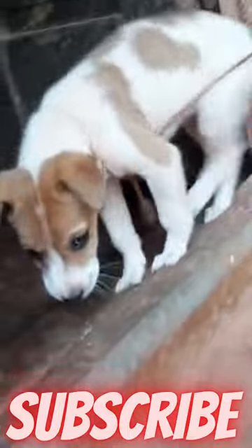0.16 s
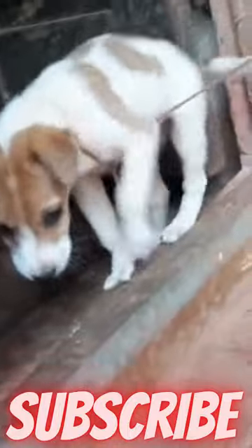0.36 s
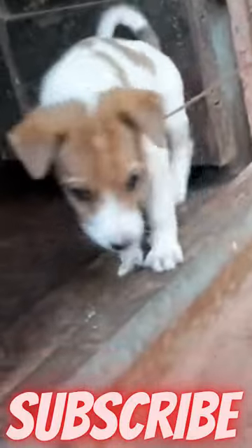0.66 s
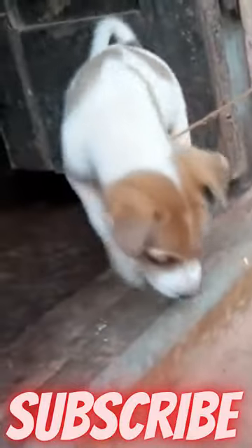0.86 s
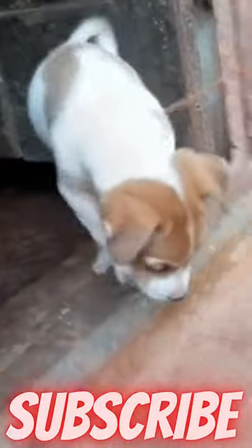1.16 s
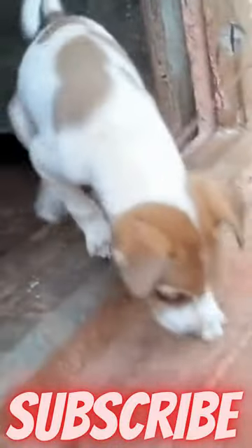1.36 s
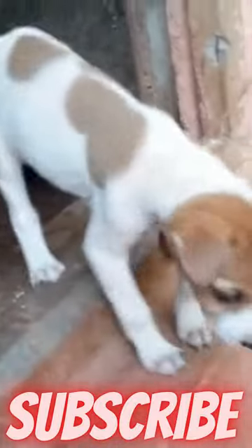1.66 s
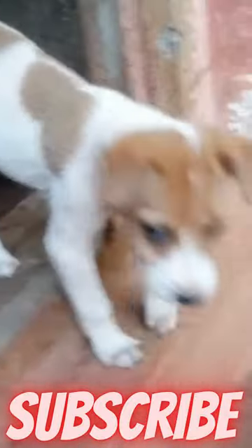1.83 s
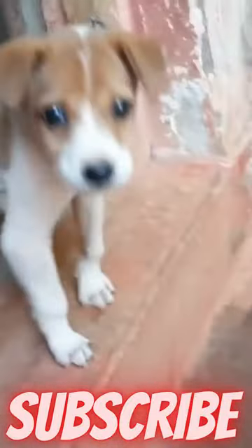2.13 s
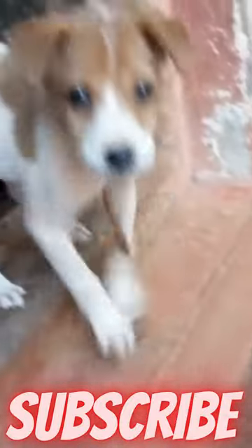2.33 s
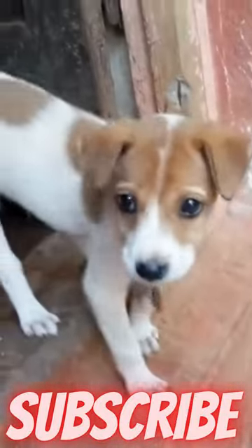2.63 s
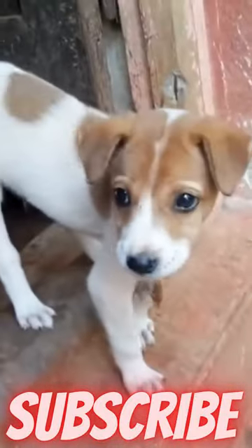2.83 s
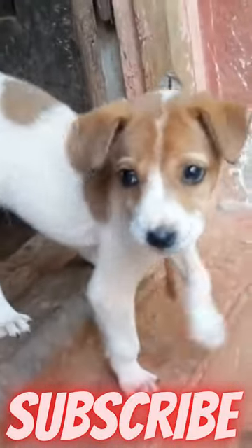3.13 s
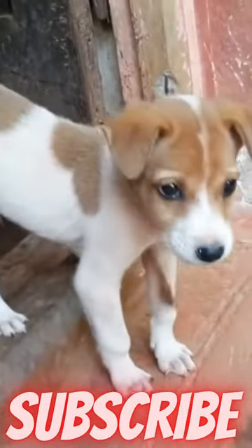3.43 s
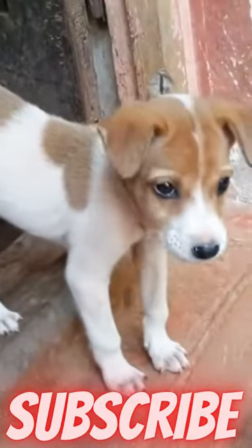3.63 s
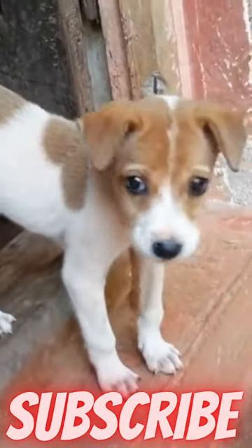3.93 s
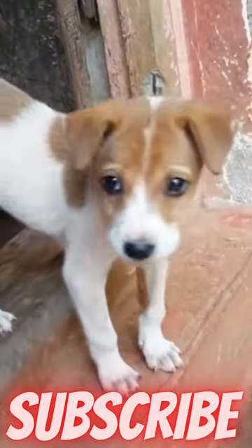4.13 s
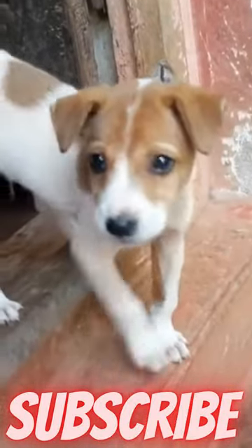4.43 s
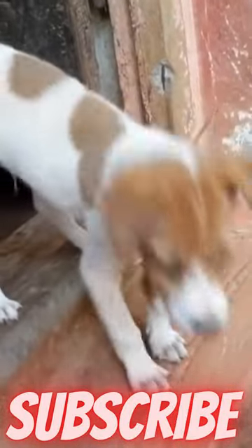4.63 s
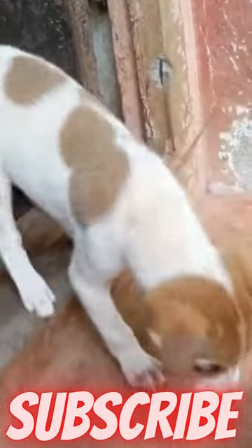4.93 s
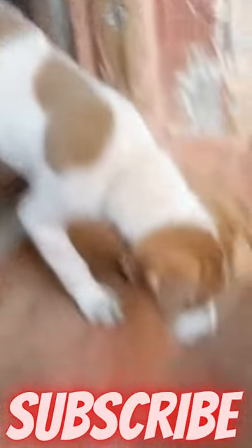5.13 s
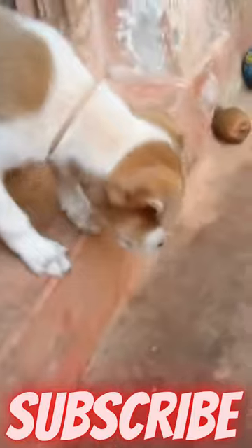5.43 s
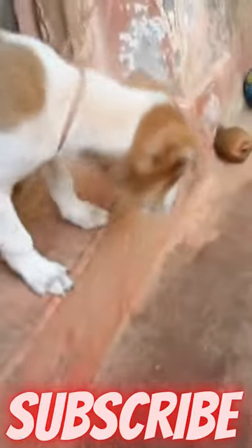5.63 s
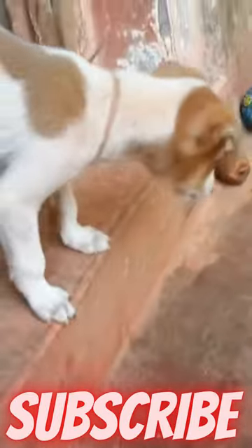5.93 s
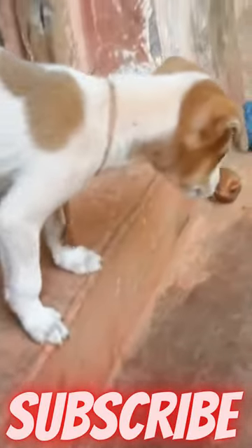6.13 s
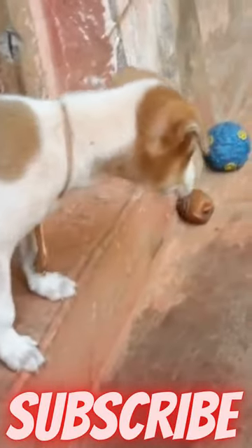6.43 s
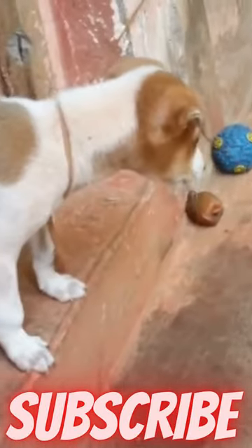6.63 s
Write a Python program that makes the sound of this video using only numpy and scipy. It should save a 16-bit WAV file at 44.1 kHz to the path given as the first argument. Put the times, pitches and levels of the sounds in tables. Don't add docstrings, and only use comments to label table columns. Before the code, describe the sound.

A small puppy very close to a phone microphone in a hard-walled concrete yard. A short whine dies away over a low hollow ringing, then small gulps, soft paw scuffs and claw ticks. A quick cluster of hollow knocks and rubbing follows on a tub. Then comes a thin rising whine, three spaced yips, one loud sharp yelp, a shaky yip and quiet low whimpers, with a short gap before the last. Faint hum beneath.

```python
import sys
import numpy as np
from scipy import signal
from scipy.fft import rfft, irfft, next_fast_len
from scipy.io import wavfile
from scipy.ndimage import uniform_filter1d

SR = 44100
rng = np.random.default_rng(int(sys.argv[2]) if len(sys.argv) > 2 else 0)


def makeup_ratio(level_db):
    decades = np.asarray(level_db, float) / 20
    return 10 ** decades


def dump(signal):
    limited = np.clip(np.atleast_2d(signal).T, -1, 1)
    pcm = np.round(limited * 32767).astype(np.int16)
    wavfile.write(sys.argv[1], SR, pcm)


N = 299420

# time_s, pitch_hz, effort_db, mouth_opening_db (as brightness)
WHINE_FADING = [(0.0, 948.7, -18, 3), (0.02, 958.8, -30, 10), (0.044, 939.9, -19, 0),
                (0.068, 924.6, -19, -3), (0.09, 943.0, -26, 2), (0.114, 904, -28, -2), (0.13, 930, -24, -8),
                (0.216, 906.3, -42, -8), (0.29, 923.9, -67, 0)]
WHINE_RISING = [(2.722, 760, -40, -21), (2.762, 922, -41, -6), (2.782, 958, -34, -12),
                (2.79, 1035, -27, -26), (2.858, 1125, -25.5, -32), (2.88, 1100, -27, -33),
                (2.9, 1185, -27, -30), (2.926, 1075, -31, -29), (2.945, 1040, -55, -4)]
YIP_LONG = [(3.474, 1196, -54, -21), (3.48, 1211, -34, -18), (3.5, 1194, -31, -15), (3.522, 1374, -28, -14),
            (3.606, 1310, -30, -14), (3.698, 1366, -26, -8), (3.73, 1360, -27, -15),
            (3.742, 1110, -30, -24), (3.766, 950, -64, 8)]
YIP_SHORT = [(4.068, 1250, -58, -25), (4.076, 1260, -31, -29), (4.09, 1140, -34, -28),
             (4.112, 1325, -26, -34), (4.142, 1345, -25, -31), (4.224, 1340, -25, -27),
             (4.237, 1240, -25.5, -25), (4.243, 1060, -33, -22), (4.262, 950, -68, 5)]
YIP_CRACKING = [(4.406, 950, -46, -20), (4.438, 955, -36, -35), (4.452, 1340, -27, -31),
                (4.478, 1450, -20.5, -17), (4.575, 1475, -20, -18), (4.609, 1590, -22, -17),
                (4.619, 1830, -40, -8), (4.632, 1400, -19, -27), (4.652, 1200, -55, -10)]
YELP = [(4.788, 975, -39, -25), (4.814, 1215, -13, -7), (4.836, 1405, -8, -11), (4.851, 1520, -10, -12),
        (4.856, 1680, -18, -9), (4.862, 1710, -11.5, -16), (4.888, 1700, -10.5, -17),
        (4.936, 1920, -16.5, -20), (4.96, 1580, -27, -30)]
YIP_WAVERING = [(5.118, 790, -39, -8), (5.163, 1030, -25, -15), (5.175, 1300, -34, -8),
                (5.228, 1260, -36, -1), (5.252, 1150, -34, -8), (5.276, 1345, -34, -2),
                (5.333, 1590, -36, -8), (5.348, 1340, -39, -24), (5.358, 1300, -58, -10)]
WHINE_SOFT = [(5.492, 852, -46, -9), (5.506, 876, -37, -11), (5.52, 985, -40, -3), (5.61, 1040, -41, -6),
              (5.628, 1200, -43, 0), (5.646, 1185, -40, -9), (5.653, 950, -45, -14), (5.668, 930, -51, -13)]
WHINE_LOW = [(5.806, 822, -45, -14), (5.822, 818, -40, -16), (5.846, 938, -39, -5), (5.862, 955, -43, -2),
             (5.9, 936, -37, -5), (5.938, 937, -38, -3), (5.971, 1016, -47, -4)]
HICCUP = [(5.974, 625, -44, -2), (5.986, 643, -36, -12), (6.004, 640, -45, -12), (6.009, 1124, -42, -10),
          (6.023, 938, -43, -22), (6.041, 950, -60, -15)]
WHINE_LAST = [(6.238, 833.8, -38, -14), (6.246, 793.5, -38, -13), (6.264, 857.3, -38, -14),
              (6.282, 876.7, -36, -14), (6.372, 825.1, -36, -14), (6.454, 841.7, -37, -17),
              (6.504, 880.0, -36, -15), (6.536, 883.7, -34, -23), (6.56, 864.2, -60, -10)]
CALLS = [WHINE_FADING, WHINE_RISING, YIP_LONG, YIP_SHORT, YIP_CRACKING, YELP, YIP_WAVERING,
         WHINE_SOFT, WHINE_LOW, HICCUP, WHINE_LAST]
# time_s, pitch_hz
NOSE_WHISTLES = [
    [(2.82, 12450), (2.885, 12400)],
    [(2.915, 13400), (2.95, 13100), (2.96, 12300)],
    [(4.455, 13500), (4.468, 13200), (4.495, 13800), (4.58, 13750), (4.61, 14050), (4.66, 11990)],
    [(4.815, 12800), (4.84, 12250), (4.875, 12600), (4.92, 12100), (4.948, 11600), (4.965, 11900)],
    [(5.165, 13600), (5.2, 12300), (5.235, 12230), (5.255, 12600), (5.28, 11980), (5.362, 11270)],
    [(5.535, 13800), (5.57, 13400), (5.665, 12960)],
    [(5.855, 12500), (5.9, 12160), (5.96, 12075), (5.985, 11550), (6.01, 12300), (6.04, 11400)],
]
# frequency_hz, gain_db
NOSE_PASSAGE = [(8000, -19), (9200, -18), (10100, -3.5), (11300, -8), (12600, -2.5), (14000, -9),
                (15700, -15)]
NOSTRIL_HZ = (11500, 14500)


def in_time(rows):
    s, *columns = np.transpose(rows)
    return [np.interp(np.arange(N) / SR, s, c) for c in columns]


def inside(tables):
    t = np.arange(N) / SR
    on = sum((t >= rows[0][0]) & (t <= rows[-1][0]) for rows in tables) > 0
    return uniform_filter1d(on * 1., size=220)


def rms_one(x):
    return x / np.sqrt(np.mean(x ** 2) + 1e-20)


def drift(rate_hz):
    r = np.exp(-40 * np.pi * rate_hz / SR)
    slow = signal.lfilter([1], [1, -2 * r, r * r], rng.standard_normal(N // 20 + 1002))
    slow = slow[1000:]
    return np.interp(np.arange(N) / 20, np.arange(len(slow)), rms_one(slow))


def ring(clicks, hz, t60_s):
    r = makeup_ratio(-60 / (t60_s * SR))
    w = 2 * np.pi * hz / SR
    return signal.lfilter([0, np.sin(w)], [1, -2 * r * np.cos(w), r * r], clicks + 1e-18)


def gain_at(spectrum, hz):
    below = (spectrum[0][0] / 2, -90)
    above = (spectrum[-1][0] * 1.1, -90)
    points = np.array([below, *spectrum, above])
    return makeup_ratio(np.interp(np.log(hz + 1), np.log(points[:, 0]), points[:, 1]))


def coloured(spectrum):
    size = next_fast_len(N)
    shaped = rfft(rng.standard_normal(size)) * gain_at(spectrum, np.fft.rfftfreq(size, 1 / SR))
    return rms_one(irfft(shaped, size)[:N])


def swells(rows):
    t = np.arange(0, N, 20) / SR
    power = 0
    for s, peak_db, rise_s, fall_s in rows:
        below_peak_db = 20 * np.maximum((s - t) / rise_s, (t - s) / fall_s)
        power = power + makeup_ratio(peak_db - below_peak_db) ** 2
    return np.interp(np.arange(N) / SR, t, np.sqrt(power))


def grown(hz, edges):
    return np.clip((hz - edges[0]) / (edges[1] - edges[0]), 0, 1)


def lifted(noise, edges, lift_db):
    size = next_fast_len(N)
    spectrum = rfft(noise, size)
    share = np.round(2 * grown(np.fft.rfftfreq(size, 1 / SR), edges)) / 2
    total, power = 0, 0
    for part in (0, .5, 1):
        band = irfft(spectrum * (share == part))[:N]
        gain = makeup_ratio(part * lift_db)
        total = total + band * gain
        power = power + np.mean(band ** 2) * gain ** 2
    return total / np.sqrt(power)


def controls():
    # start_s, end_s, first_crest_s, rate_per_s, share_of_pitch
    tremors = [
        (2.8, 2.93, 2.815, 23.5, .015),
        (5.17, 5.34, 5.18, 21.3, .025),
        (4.47, 4.58, 4.495, 21, .01),
    ]
    # time_s, octave_over_fundamental_db, mouth_ring_hz, jaw_lift_db,
    # lip_lift_db
    jaw_shape = [(0, 14, 3800, 0, 3), (.05, 18, 3900, 0, 3), (.1, 15, 4000, 3, 0), (.15, 13, 4500, 5, 3),
                 (.2, 2, 4600, 5, 8), (.29, -10, 4600, 0, 4), (2.722, 3, 4600, 0, 0),
                 (2.762, -12, 4550, 8, 8), (2.79, -26, 5000, 3, 12), (2.84, -36, 5000, 0, 12),
                 (2.9, -29, 4700, -8, 9), (2.945, -22, 4500, 0, 13), (3.474, -22, 4850, 8, 12),
                 (3.538, -24, 4300, 0, 17), (3.575, -21, 4000, 0, 5), (3.616, -17, 5100, 0, 11),
                 (3.65, -20, 4100, 0, 10), (3.72, -20, 4100, 0, 12), (3.75, -33, 5400, -15, 3),
                 (4.068, -25, 4800, 0, 0), (4.133, -35, 4000, 0, 8), (4.16, -28, 5300, 0, 9),
                 (4.22, -31, 5300, 0, 8), (4.262, -31, 5000, -8, 10),
                 (4.406, -22, 4500, 15, 0), (4.442, -19, 4500, 15, 0), (4.468, -25, 5600, 0, 5),
                (4.494, -39, 4400, 0, 2), (4.52, -31, 5750, 0, 0), (4.55, -41, 4400, 0, 3),
                (4.575, -52, 4400, 0, 7), (4.6, -35, 4600, 0, 14), (4.652, -39, 5200, 0, 12),
                (4.784, -19, 5000, 15, 6), (4.808, -8, 5200, 12, 3), (4.826, -14, 5450, 8, 0),
                (4.844, -27, 4600, 0, -7), (4.862, -8, 5100, 0, 12), (4.895, -11, 5300, 0, 14),
                (4.926, -15, 5600, 0, 13), (4.96, -27, 5000, 0, 18), (5.118, 5, 4800, 20, -5),
                (5.152, -8, 4000, 6, -5), (5.19, 1, 5250, 0, -8), (5.236, 6, 5000, -3, -8),
                (5.258, -1, 4600, 0, -3), (5.28, -3, 4150, 3, -14), (5.31, -3, 4400, 0, -6),
                (5.326, -15, 4700, 0, 8), (5.365, -21, 4600, 0, 8),
                 (5.492, -7, 4300, 10, 0), (5.523, -8, 3950, 5, -8), (5.567, 2, 5050, 0, 8),
                (5.59, -19, 4150, 0, -5), (5.611, -17, 4200, -10, 0), (5.633, -5, 4700, 0, 0),
                (5.668, -15, 4700, 0, 0), (5.806, -5, 4850, 5, 0), (5.838, -18, 4470, 5, -10),
                (5.87, -8, 4750, -3, -8), (5.93, -6, 4650, -5, -8), (5.971, 5, 4200, 0, 0),
                (5.974, 12, 4100, 0, 0), (6.041, -22, 4250, 0, 0), (6.238, -7, 5000, 10, 0),
                (6.27, -9, 4700, 0, -15), (6.31, -11, 5000, 0, -12), (6.4, -9, 5000, 0, -3),
                (6.5, -15, 4350, 4, -5), (6.532, 3, 4400, 8, 0), (6.56, -9, 4400, 0, 0)]
    pitch, effort_db, open_db = in_time(sum(CALLS, []))
    t = np.arange(N) / SR
    for start, end, crest, per_s, share in tremors:
        tremble = np.cos(2 * np.pi * per_s * (t - crest))
        pitch = pitch * (1 + share * inside([[(start,), (end,)]]) * tremble)
    octave_db, *jaw = in_time(jaw_shape)
    first_db = effort_db - 10 * np.log10(1 + makeup_ratio(octave_db) ** 2)
    mouth_db = uniform_filter1d(effort_db + open_db, size=176)
    return pitch, first_db, first_db + octave_db, mouth_db, *jaw


def nose_whistle(phase, pitch, nostril_db, fall_db=6.0):
    hz = in_time(sum(NOSE_WHISTLES, []))[0] * (1 + .004 * drift(90))
    carrier = 2 * np.pi * np.cumsum(hz) / SR
    wavering = drift(30)
    out, power = 0, 1e-9
    for k in range(-3, 4):
        line_hz = hz + k * pitch
        shape_db = -fall_db * np.sqrt(abs(k)) + nostril_db * grown(line_hz, NOSTRIL_HZ)
        gain = gain_at(NOSE_PASSAGE, line_hz) * makeup_ratio(shape_db)
        waver = makeup_ratio(4.0 * np.roll(wavering, 9000 * k))
        out = out + gain * waver * np.sin(carrier + k * phase)
        power = power + gain ** 2
    return out / np.sqrt(power)


def voice(low_breath_db=-38, ring_db=14.0, ring_width_hz=480, nose_breath=.38):
    # start_s, end_s, breath_share
    breaks = [(0, .19, .02), (.19, .3, .45), (2.72, 2.96, .3), (3.735, 3.77, .7), (4.07, 4.236, .12),
              (4.236, 4.27, .6), (4.612, 4.67, .55), (4.8, 4.93, .04), (4.93, 4.98, .3), (5.11, 5.37, .1),
              (5.63, 5.67, .4), (5.97, 6.05, .55), (6.545, 6.57, .3)]
    # frequency_hz, gain_db
    mouth_passage = [(2300, -1.5), (3000, -11), (4500, 0), (5600, 0), (6500, -15), (7600, -25),
                     (8600, -36.5)]
    # time_s, flow_db, nostril_top_lift_db
    nostril_flow = [(0, -64, -14), (.12, -61, -14), (.19, -66, -12), (.205, -60, -8), (.24, -69, -8),
                    (.3, -99, -8), (2.745, -99, -15), (2.765, -71, -15), (2.815, -61, -5), (2.84, -52, 5),
                    (2.866, -61, -3), (2.892, -62, -12), (2.918, -55, 0), (2.955, -60, 0), (2.98, -99, 0),
                    (3.47, -99, -10), (3.49, -79, -10), (3.54, -65, -25), (3.6, -68, -15),
                    (3.66, -60, -25), (3.72, -57, -15), (3.746, -55, -5), (3.768, -72, -5),
                    (3.8, -99, -5), (4.085, -99, -25), (4.107, -73, -25), (4.135, -68, -20),
                    (4.22, -68, -14), (4.237, -55, -8), (4.26, -62, -8), (4.285, -99, -8),
                    (4.44, -99, 0), (4.468, -58, 0), (4.6, -58, 0), (4.624, -48, 3), (4.65, -57, 0),
                     (4.685, -99, 0), (4.785, -99, 8), (4.82, -47, 8), (4.85, -45, 5), (4.875, -50, 0),
                     (4.926, -43, -3), (4.955, -46, -10), (4.995, -99, -10), (5.112, -99, -20),
                     (5.126, -71, -20), (5.152, -69, -15), (5.17, -60, 0), (5.236, -52, 0), (5.26, -55, 5),
                     (5.3, -60, -8), (5.346, -61, -12), (5.39, -99, -12), (5.49, -99, -25),
                     (5.523, -65, -25), (5.545, -70, 0), (5.567, -60, 10), (5.611, -55, 8), (5.64, -57, 3),
                     (5.66, -66, 0), (5.69, -99, 0), (5.82, -99, -5), (5.88, -76, -5), (5.93, -73, -8),
                     (5.97, -62, -6), (6.0, -64, -3), (6.02, -60, -3), (6.05, -75, -5), (6.08, -99, -5)]
    # peak_s, peak_db, rise_20db_s, fall_20db_s
    grumbles = [
        (2.692, -46, .08, .02),
        (2.8, -47, .06, .22),
    ]
    # frequency_hz, density_db (per Hz)
    chest = [(250, -8), (400, 0), (560, -3), (900, -12)]
    jaw_hz, lips_hz = (4200, 3200), (5600, 7000)

    breath = 0.035 + sum(share * inside([[(start,), (end,)]]) for start, end, share in breaks)
    pitch, first_db, octave_db, mouth_db, ring_hz, jaw_db, lips_db = controls()
    nose_db, nostril_db = in_time(nostril_flow)
    gate = inside(CALLS)
    on = gate > 0
    jitter = .004 * drift(50) + .025 * breath * drift(250)
    pitch = uniform_filter1d(pitch, size=88) * (1 + jitter)
    phase = 2 * np.pi * np.cumsum(pitch) / SR
    fundamental = makeup_ratio(first_db + .5 * drift(40)) * np.sin(phase)
    octave = makeup_ratio(octave_db + 1.8 * drift(51)) * np.cos(2 * phase)
    low_breath = makeup_ratio(first_db + low_breath_db) * coloured([(500, -12), (1400, 2.5), (2600, -8.5)])
    out = gate * (np.sqrt(2) * (fundamental + octave) + low_breath)

    whistling = inside(NOSE_WHISTLES)
    out += makeup_ratio(nose_db + 1.5) * whistling * nose_whistle(phase, pitch, nostril_db)
    nose_db = nose_db - 8.0 * whistling
    nose_air = breath + nose_breath + 0.46 * whistling + 1 - gate
    for passage, level_db, waver_db, air, edges, top_db, open_for_air in (
            (mouth_passage, mouth_db, 2.2, breath, lips_hz, lips_db, gate),
            (NOSE_PASSAGE, nose_db, 6.0, nose_air, NOSTRIL_HZ, nostril_db, 1)):
        stack, power = 0, 1e-9
        air = np.clip(air, 0, 1)
        wavering = drift(57)
        for k in range(3, 21):
            hz = k * pitch[on]
            shape_db = ring_db / (1 + ((hz - ring_hz[on]) / ring_width_hz) ** 2)
            shape_db = shape_db + jaw_db[on] * grown(hz, jaw_hz) + top_db[on] * grown(hz, edges)
            gain = gain_at(passage, hz) * makeup_ratio(shape_db)
            waver = makeup_ratio(waver_db * np.roll(wavering, 9000 * k)[on])
            stack = stack + gain * waver * np.cos(k * phase[on] + k * k)
            power = power + gain ** 2 / 2
        puffs = lifted(coloured(passage), edges, top_db) * (1 + .5 * np.cos(phase))
        tone_gain = gate * makeup_ratio(level_db - .3 * waver_db) * np.sqrt(1 - air ** 2)
        out[on] += tone_gain[on] * stack / np.sqrt(power)
        out += open_for_air * makeup_ratio(level_db) * air * puffs
    return out + swells(grumbles) * makeup_ratio(2.0 * drift(40)) * coloured(chest)


def tub():
    # peak_s, peak_db, rise_20db_s, fall_20db_s
    rubs = [
        (2.0, -57, .2, .3),
        (2.07, -23, .03, .12),
        (2.486, -49, .15, .5),
        (2.728, -45, .17, .17),
        (3.276, -55, .09, .09),
    ]
    # start_s, deep_modes_db, high_modes_db
    knock_rows = [
        (2.052, -22, -19),
        (2.064, -27, -18),
        (2.127, -39, -18),
        (2.205, -52, -35.5),
    ]
    # frequency_hz, level_db, t60_s
    shell_modes = [(191, 7.0, 0.17), (307, -12, 0.33), (670, -6, 0.085), (720, -10, 0.08), (928, -8, 0.037),
                   (1150, -21, 0.04)]
    low_hz, low_db, low_t60_s = 145, -34.5, 0.68
    contacts = rng.standard_normal(N) * (rng.random(N) < 6000. / SR)
    drive = contacts * swells(rubs)
    knocks = np.zeros((2, N))
    for s, deep_db, high_db in knock_rows:
        knocks[:, round(s * SR)] = makeup_ratio(deep_db), makeup_ratio(high_db)
    blows = signal.lfilter([.03], [1, -.97], knocks)
    modes = 0
    for hz, level_db, t60_s in shell_modes:
        push = makeup_ratio(-22.5) * drive + blows[int(hz > 250)]
        modes = modes + makeup_ratio(level_db) * ring(push, hz, t60_s)
    thud = signal.sosfilt(signal.butter(2, [400, 1050], "band", fs=SR, output="sos"), drive)
    fading_db = low_db - 60 * np.arange(N) / SR / low_t60_s
    rumble = makeup_ratio(fading_db) * rms_one(ring(contacts, low_hz, 0.12))
    shell = modes + makeup_ratio(5.0) * thud + rumble
    return signal.sosfilt(signal.butter(4, [160, 4500], "band", fs=SR, output="sos"), shell)


def paws():
    # peak_s, peak_db, rise_20db_s, fall_20db_s
    scuff_rows = [
        (0, -51.5, .1, .45),
        (.56, -61.5, .08, .3),
        (.86, -68, .08, .15),
        (1.89, -66, .04, .6),
        (2.062, -57, .015, .2),
        (2.15, -67, .4, .6),
        (2.53, -59.5, .27, .27),
        (2.72, -57, .2, .45),
        (2.95, -56, .4, .15),
        (3.27, -59, .13, .12),
    ]
    # frequency_hz, density_db (per Hz)
    scuff_colour = [(180, -33.5), (300, -2), (459, -4), (1020, -6), (1910, -15.5), (4500, -14), (7500, -30),
                    (15000, -48)]
    rest_db = -77
    return (swells(scuff_rows) + makeup_ratio(rest_db)) * makeup_ratio(2.0 * drift(30)) * coloured(scuff_colour)


def yard_hum():
    # frequency_hz, density_db (per Hz)
    hum_colour = [(15, -24), (25, 0), (49, -11.5), (204, -9), (445, -17.5), (782, -19.5), (1020, -27),
                  (1170, -20), (2010, -30.5), (5010, -35.5), (5430, -31), (7910, -45.5), (15500, -47)]
    # time_s, level_db
    hum_swell = [(0, 1.5), (3.0, 2), (4.5, 4.5), (5.3, 0), (6.15, -2.5), (6.5, 5), (6.8, 0)]
    return makeup_ratio(-66.0 + in_time(hum_swell)[0] + 0.28 * drift(3)) * coloured(hum_colour)


def creaks():
    # start_s, length_s, peak_db, low_resonance_hz, second_resonance_db
    gulps = [
        (0.524, .011, -34, 584, -8),
        (1.366, .006, -50, 581, -12.5),
        (5.633, .02, -45.5, 600, -2),
    ]
    slow_creaks = [
        (1.006, .028, -34, 585, 0.5),
        (2.716, .028, -31, 793, -1),
        (6.217, .027, -30, 664, -5),
    ]
    glottal_clicks = [
        (4.403, .006, -37, 920, -10.5),
        (4.779, .005, -28.5, 1130, 1.5),
        (5.113, .008, -33, 790, -5),
        (5.487, .008, -35, 722, -1),
        (5.806, .008, -40.5, 664, -1.5),
    ]
    third_hz, third_db = 4700, -21
    out = np.zeros(N)
    kinds = ((gulps, 590, 1180), (slow_creaks, 215, 1545), (glottal_clicks, 300, 1545))
    events = [(*kind, *row) for rows, *kind in kinds for row in rows]
    for per_s, second_hz, s, length, peak_db, low_hz, second_db in events:
        chance = rng.standard_normal((2, 12))
        times = np.cumsum((1 + 0.1 * chance[0]) / per_s)
        times -= times[0]
        kept = times < length
        swell_db = -5.0 * (2 * times / length - 1) ** 2
        clicks = np.zeros(SR // 10)
        clicks[(times[kept] * SR).astype(int)] = makeup_ratio(peak_db + swell_db + 2 * chance[1])[kept]
        sound = ring(clicks, low_hz, .02) - makeup_ratio(second_db) * ring(clicks, second_hz, .024)
        sound = signal.sosfilt(signal.butter(3, 2200, fs=SR, output="sos"), sound)
        rasp = np.convolve(clicks, np.hanning(200))[:len(clicks)] * rng.standard_normal(len(clicks))
        third = ring(ring(rasp, third_hz, .0015), third_hz, .001) / 6
        sound += makeup_ratio(third_db + second_db) * third
        out[round(s * SR):][:len(sound)] += sound
    return signal.sosfilt(signal.butter(2, [260, 6000], "band", fs=SR, output="sos"), out)


def claws():
    # start_s, peak_db, frequency_hz, ring_cycles
    ticks = [
        (0.8394, -48, 2550, 1.9),
        (1.516, -56, 5200, 4.8),
        (1.8025, -40, 5540, 12),
        (1.8705, -42, 2300, 4.5),
        (1.871, -47, 4800, 8),
        (1.8715, -45, 800, 3.0),
        (2.536, -47, 4000, 3.2),
    ]
    out = np.zeros(N)
    for s, peak_db, hz, cycles in ticks:
        click = rng.standard_normal(441) * makeup_ratio(-np.arange(441) * 1.5)
        strike = click * np.hanning(882)[:441] ** .3
        tick = ring(ring(strike, hz, cycles / hz), hz, 2.5 / hz)
        out[round(s * SR):][:441] += makeup_ratio(peak_db) * tick / np.abs(tick).max()
    return out


def squeaks():
    # start_s, length_s, from_hz, to_hz, level_db
    squeak_rows = [
        (3.744, 0.012, 13300, 12100, -36),
        (4.235, 0.016, 12800, 11300, -50),
        (4.957, 0.018, 13480, 11300, -50),
    ]
    out = np.zeros(N)
    for s, length, from_hz, to_hz, level_db in squeak_rows:
        size = round(length * SR)
        glide = np.cumsum(np.linspace(from_hz, to_hz, size)) / SR
        out[round(s * SR):][:size] += makeup_ratio(level_db) * np.hanning(size) * np.sin(2 * np.pi * glide)
    return out


def walls(x):
    # frequency_hz, gain_db
    wall_colour = [(150, -16), (600, -5), (1200, -10), (2000, -5.5), (4000, -2.5), (6000, -6),
                   (14000, -8.5)]
    t60_s = 0.3
    t = np.arange(SR // 2) / SR
    echoes = coloured(wall_colour)[:len(t)] * makeup_ratio(-60 * t / t60_s) * (t > .006)
    echoes *= 1 + 5.0 * np.exp(-t / 0.012)
    return signal.fftconvolve(x, echoes / np.sqrt(np.sum(echoes ** 2)))[:N]


def scene():
    near = voice() + tub() + paws() + creaks() + claws() + squeaks()
    return (near + makeup_ratio(-16) * walls(near) + yard_hum())[None]


def top_cut(x):
    return signal.sosfilt(signal.butter(12, 15710, fs=SR, output="sos"), x)


def record(dry):
    heard = signal.sosfilt(signal.butter(4, 48, "high", fs=SR, output="sos"), dry)
    return top_cut(heard)


dry = scene()
out = record(dry)
dump(out)
```